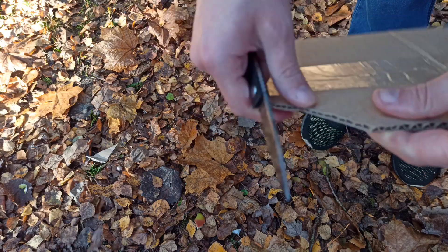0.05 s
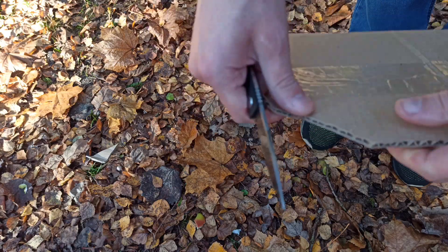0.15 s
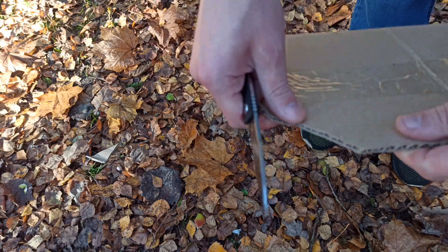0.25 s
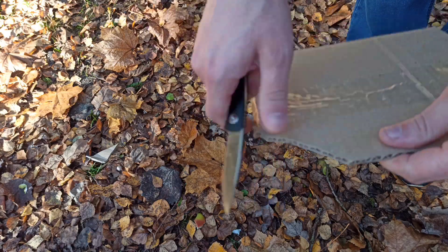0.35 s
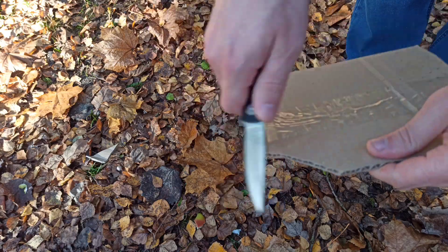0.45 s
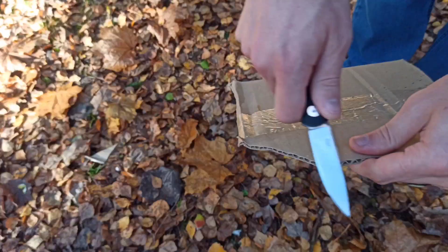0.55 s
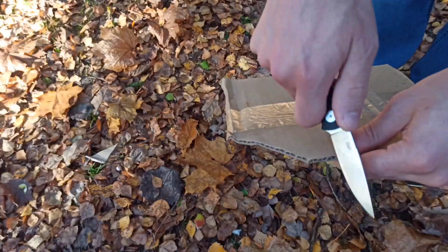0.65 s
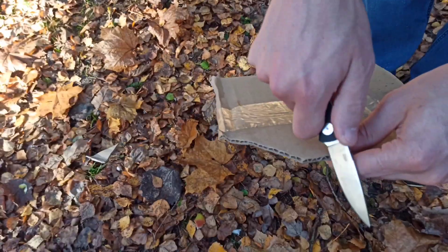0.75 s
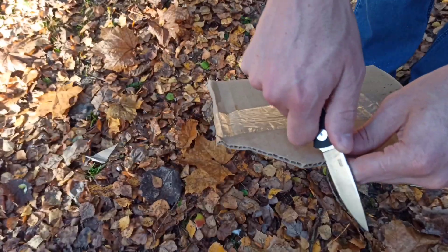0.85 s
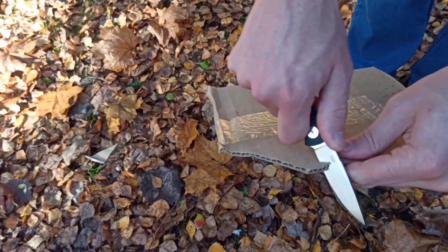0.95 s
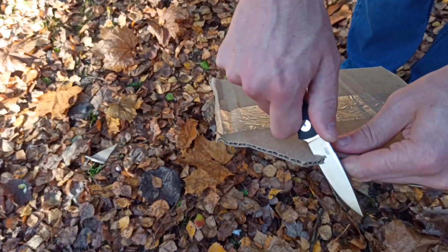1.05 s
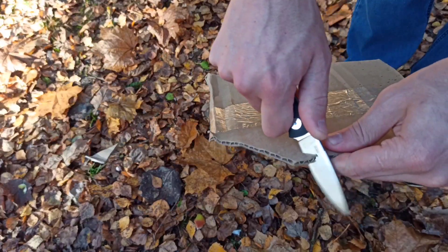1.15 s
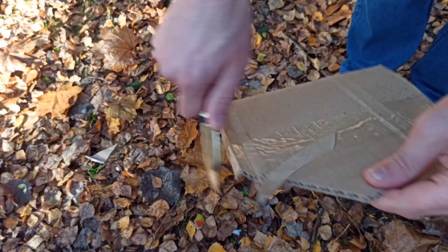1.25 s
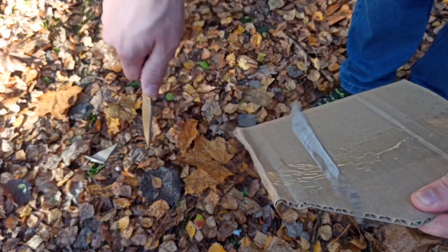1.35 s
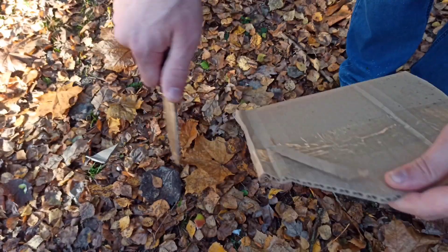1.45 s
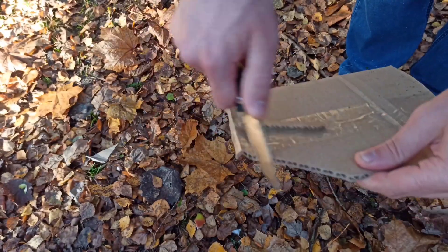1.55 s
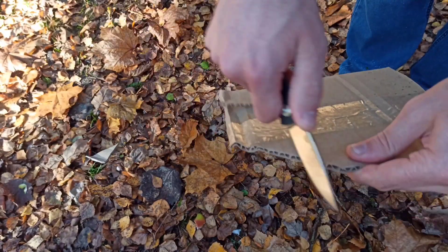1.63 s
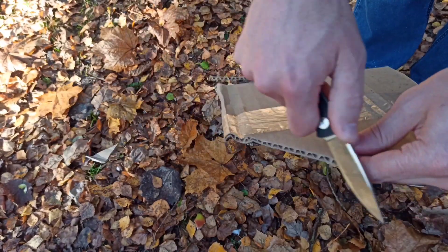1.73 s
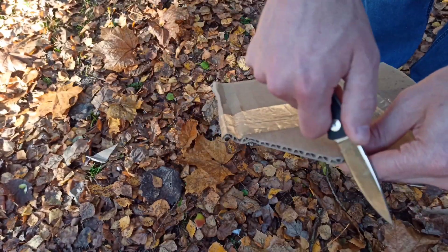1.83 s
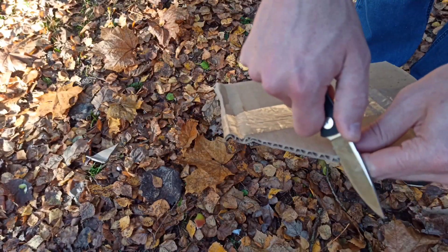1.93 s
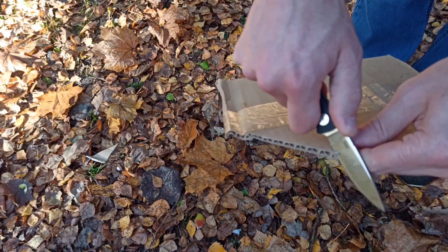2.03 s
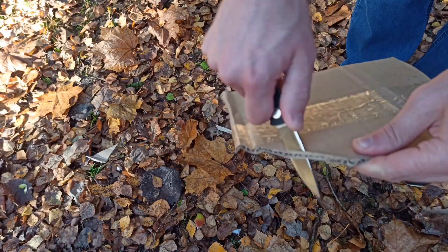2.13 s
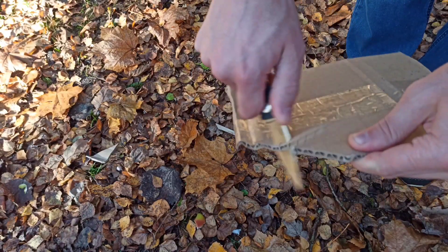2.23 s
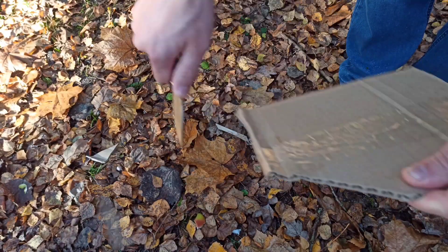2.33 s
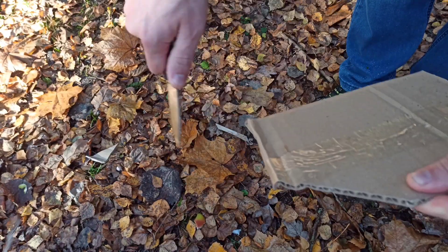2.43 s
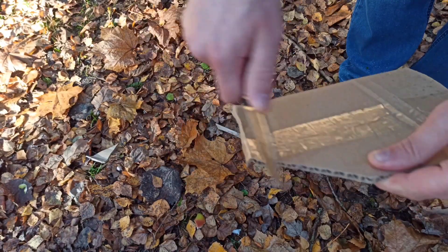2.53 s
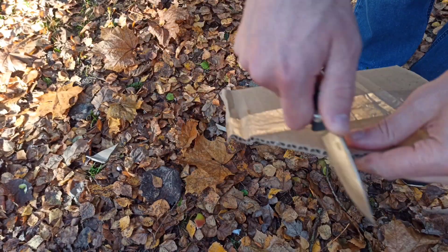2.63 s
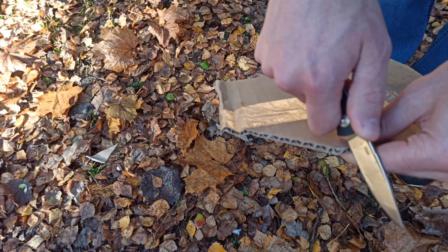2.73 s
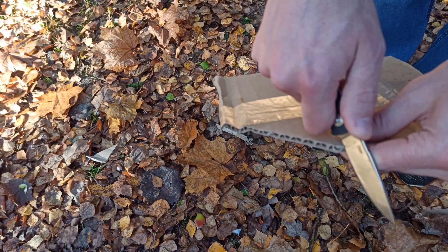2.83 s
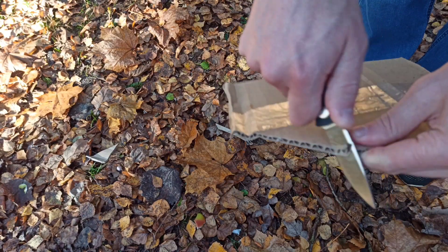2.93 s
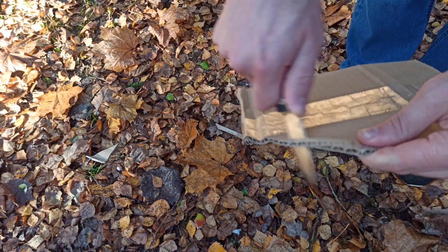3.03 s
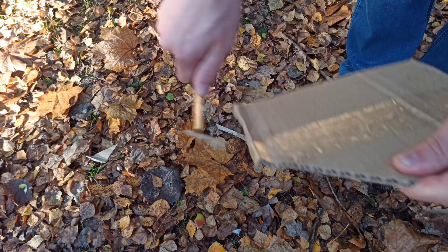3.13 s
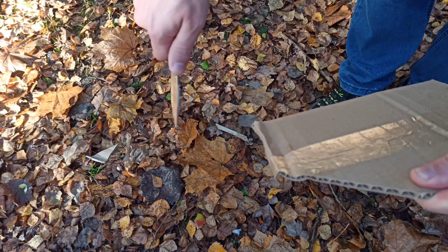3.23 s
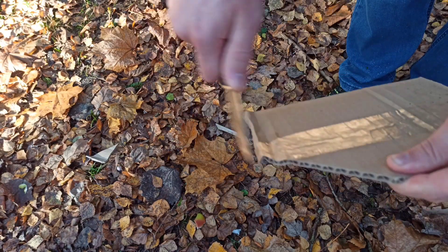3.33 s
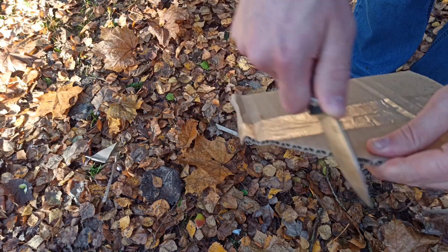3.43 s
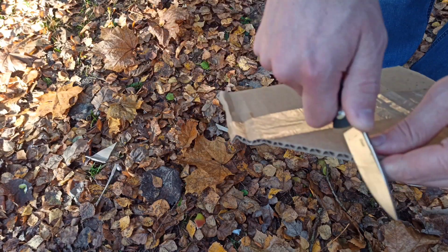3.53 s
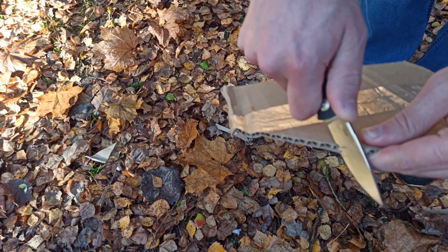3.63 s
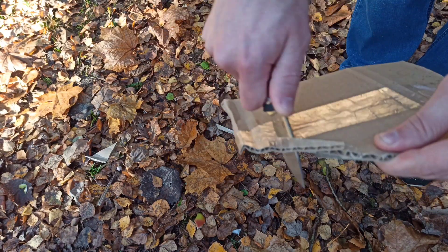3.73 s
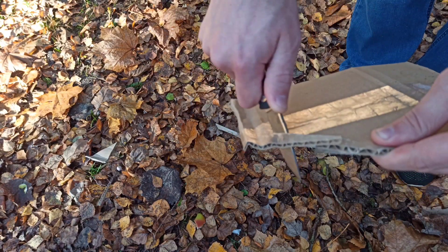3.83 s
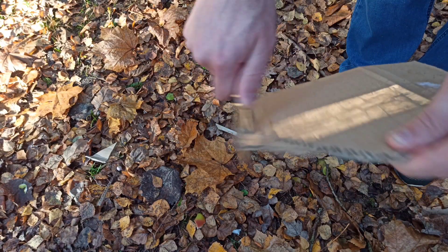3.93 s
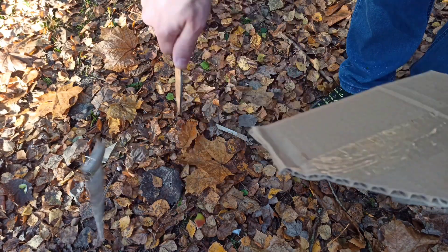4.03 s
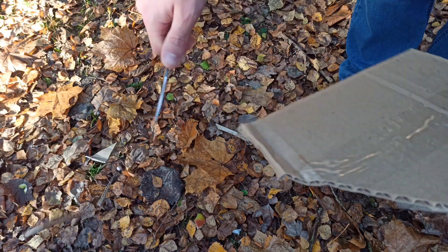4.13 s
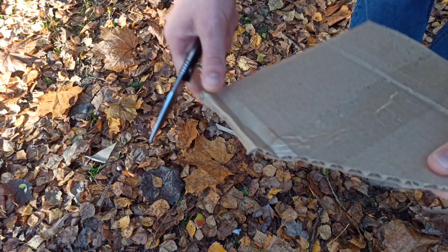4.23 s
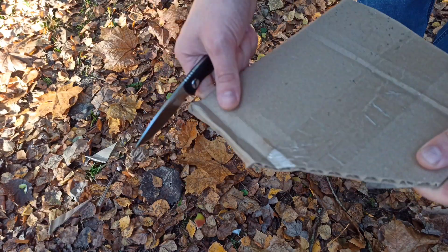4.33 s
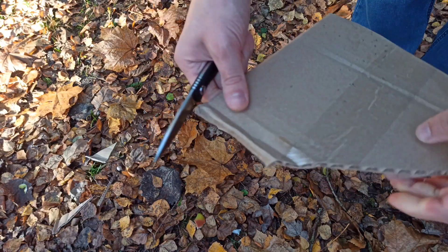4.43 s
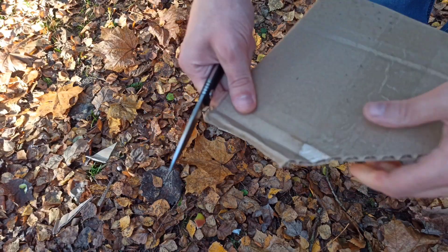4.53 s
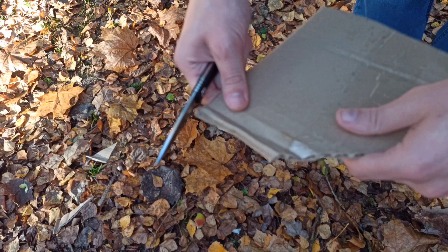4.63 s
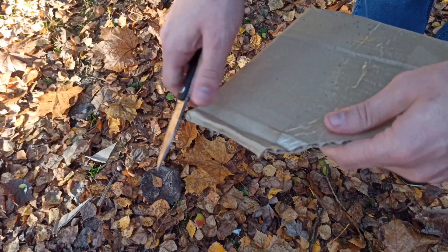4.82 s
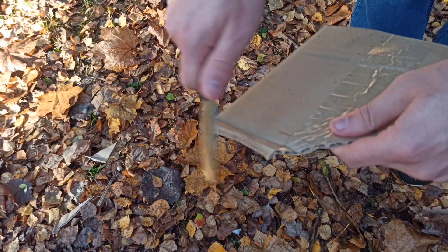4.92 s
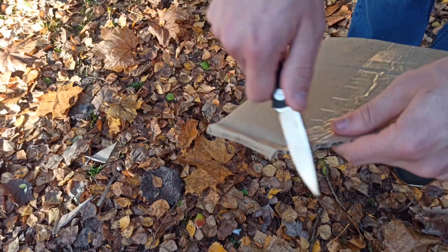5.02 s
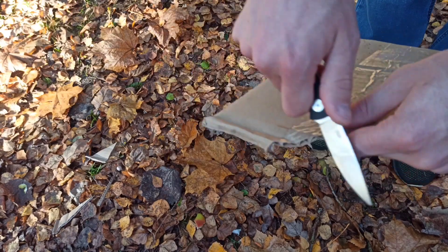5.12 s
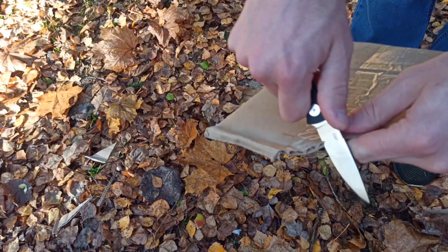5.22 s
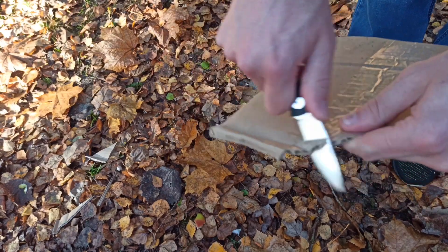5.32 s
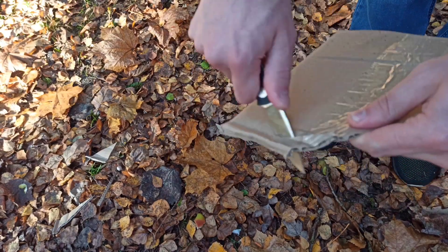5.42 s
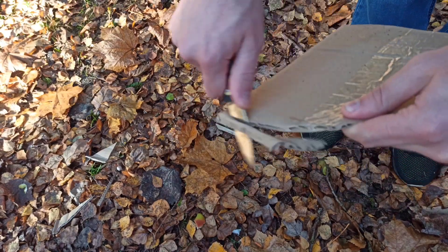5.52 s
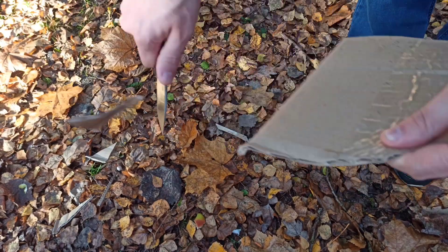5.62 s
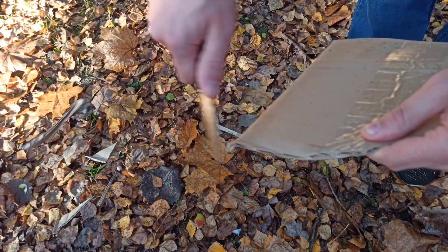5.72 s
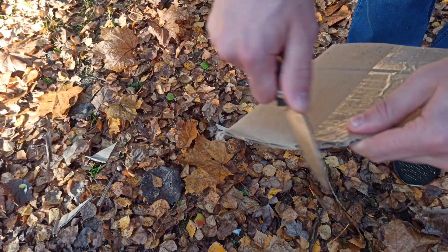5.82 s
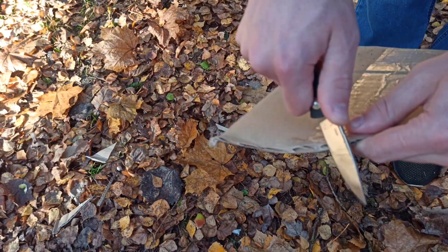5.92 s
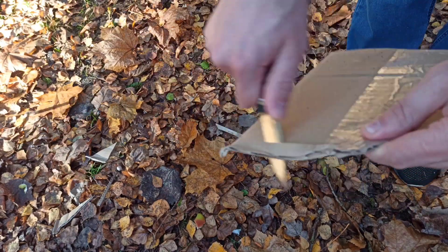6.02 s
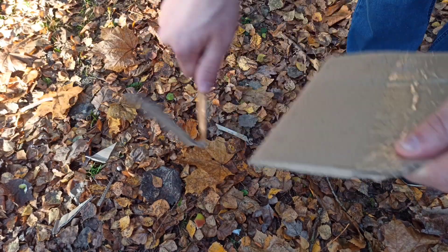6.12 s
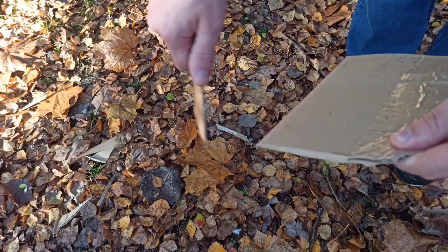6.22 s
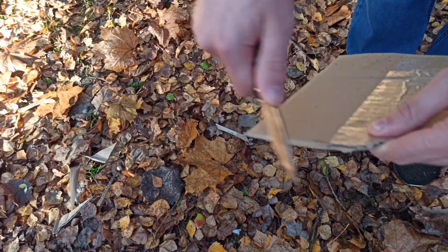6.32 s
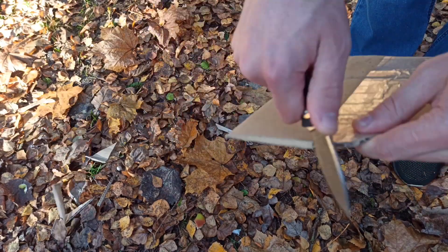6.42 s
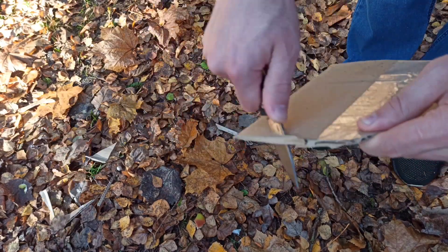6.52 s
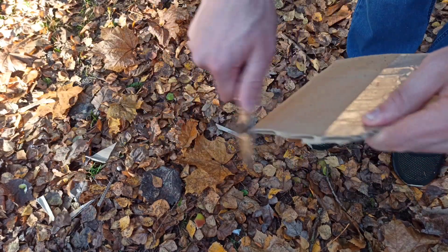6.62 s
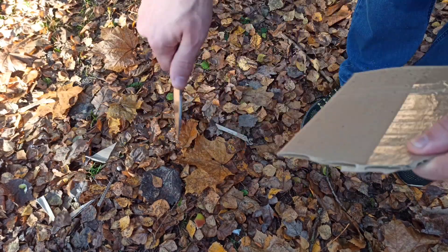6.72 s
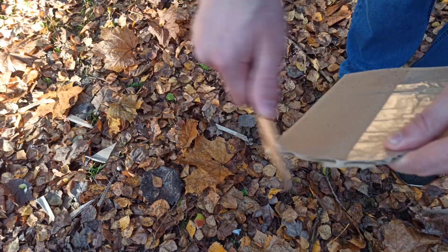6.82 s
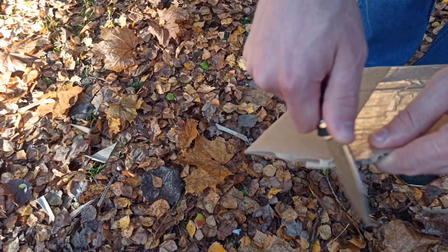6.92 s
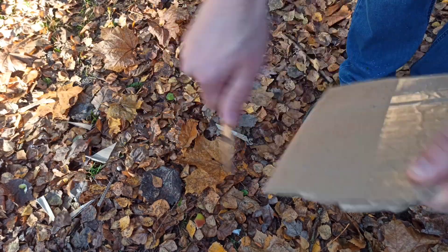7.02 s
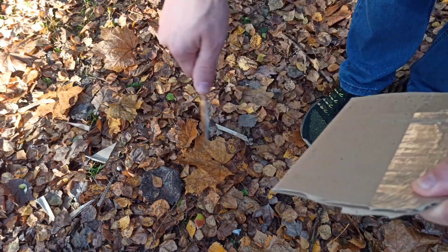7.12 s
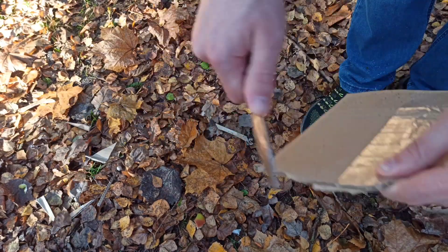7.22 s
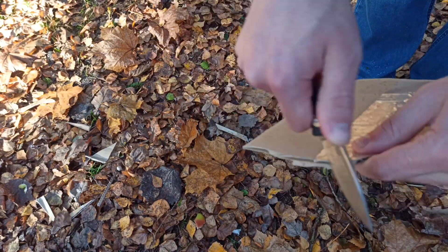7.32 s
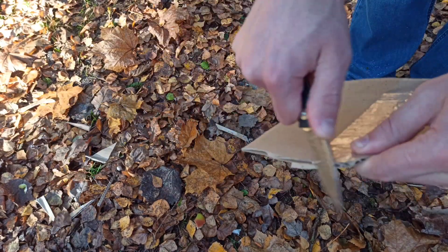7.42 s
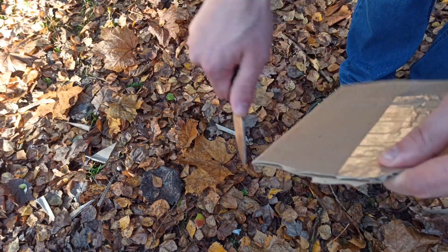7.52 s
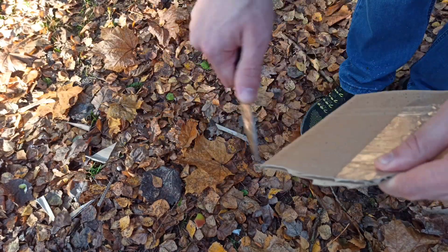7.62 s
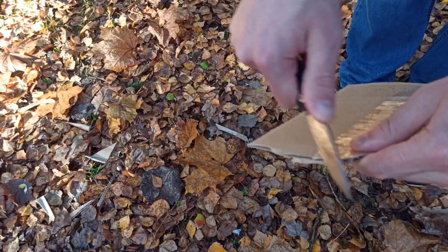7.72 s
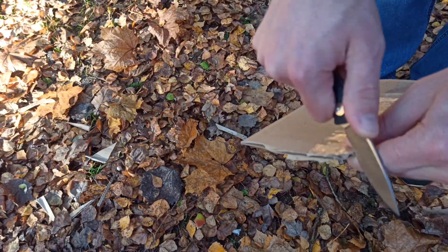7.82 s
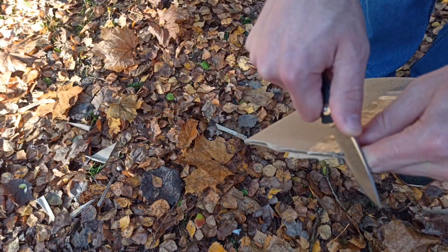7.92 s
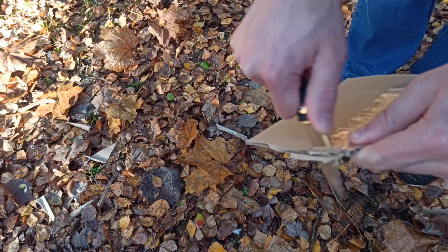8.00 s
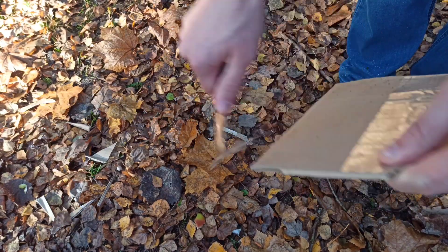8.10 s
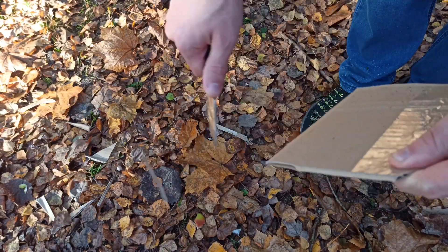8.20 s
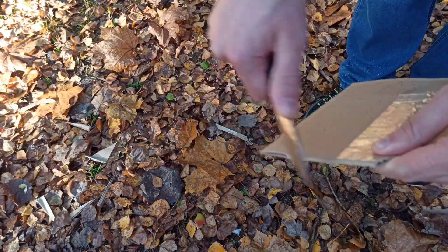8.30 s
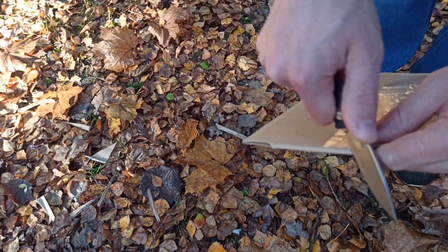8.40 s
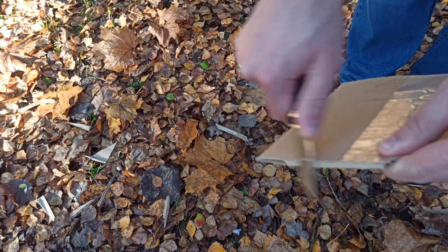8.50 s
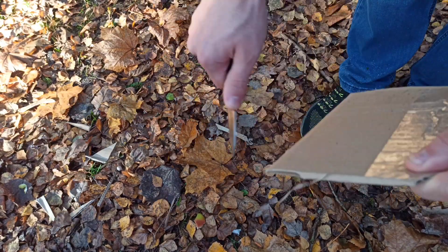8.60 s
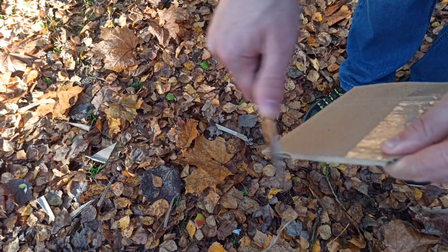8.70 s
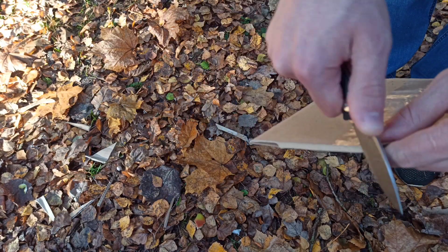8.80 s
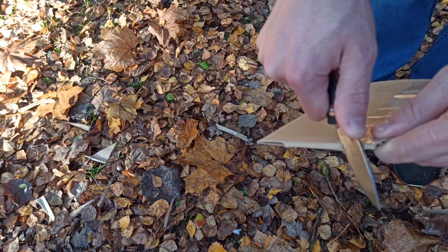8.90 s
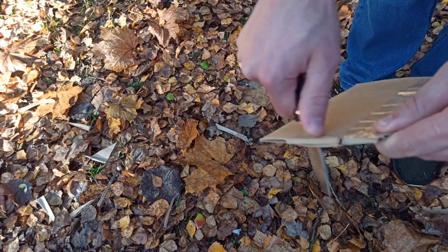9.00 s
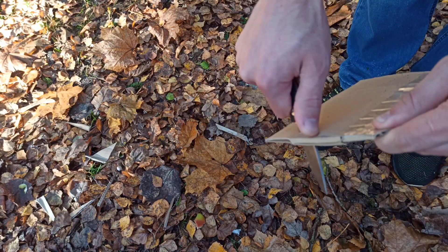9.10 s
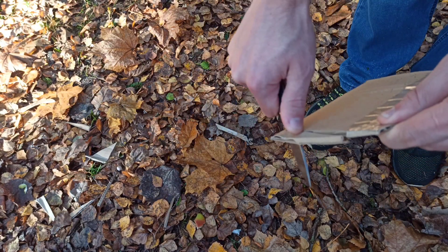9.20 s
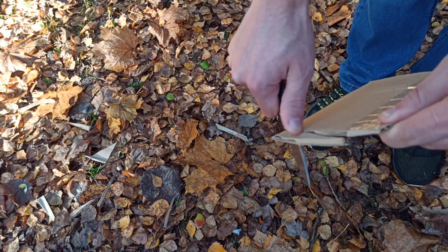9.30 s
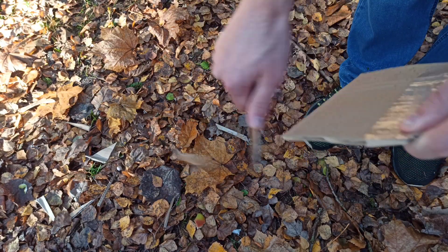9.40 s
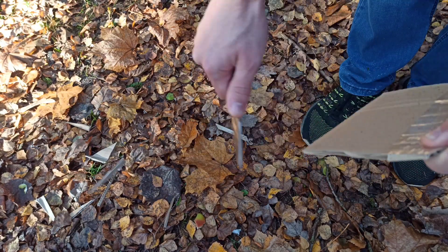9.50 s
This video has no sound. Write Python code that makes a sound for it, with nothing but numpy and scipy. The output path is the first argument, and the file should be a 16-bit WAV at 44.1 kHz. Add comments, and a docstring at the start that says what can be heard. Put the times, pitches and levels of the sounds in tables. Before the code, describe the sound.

Close, dry outdoor sound of a knife cutting strips from a hand-held sheet of corrugated cardboard. Short tearing rasps with bright hiss end in hollow cardboard pops and sharp cracks. A strip rattles briefly on the sheet after the first cut. Blade ticks, scuffs and soft thuds fill the gaps. After a handling pause mid-way, cuts become hissier, quicker and mostly softer. Faint air behind, phone microphone.

```python
"""A knife slices strips off a hand-held sheet of corrugated cardboard, close to a phone outdoors.
Parting fibres are dense random clicks, coloured into hiss and rasp, that also shake the sheet's modes.
At the end of a cut the sheet springs back with a hollow modal pop; louder cracks are noise bursts.
Between cuts the blade ticks and scuffs, touches thud in the sheet and one strip rattles down on it.
Behind it lies faint, slightly wavering shaped noise, plus a few faint midrange noise bursts."""
import sys
import numpy as np
from scipy import signal
from scipy.fft import rfft, irfft
from scipy.io import wavfile
from scipy.ndimage import uniform_filter1d

SR = 44100
rng = np.random.default_rng(int(sys.argv[2]) if len(sys.argv) > 2 else 0)


def persist_wave(psi):
    """Save psi, clipped to +-1, as 16-bit WAV."""
    counts = np.round(np.clip(psi, -1, 1) * 32767).astype(np.int16)
    wavfile.write(sys.argv[1], SR, np.atleast_2d(counts).T)


N = 421155


def undb(db):
    """Decibels to gain."""
    return 10 ** (np.asarray(db) / 20)


def unit(x):
    """Scale to rms 1."""
    return x / np.std(x)


def add(out, s, sound):
    """Mix a sound in at time s."""
    i = max(int(s * SR), 0)
    out[i:i + len(sound)] += sound[:N - i]


def walk(rate):
    """Smooth random wander with a spread near 1, taking `rate` steps a second."""
    k = int(SR / rate)
    steps = np.repeat(rng.standard_normal(N // k + 1), k)[:N]
    return uniform_filter1d(steps, k)


def colour(x, points):
    """Minimum-phase filter with the given (Hz, dB) outline: the sound keeps its sharp onset."""
    hz, db = np.transpose(points)
    size = 4096
    grid = np.maximum(np.arange(size // 2 + 1) * SR / size, 1)
    outline_db = np.interp(np.log(grid), np.log(np.sort(hz)), db)
    cepstrum = irfft(np.log(undb(outline_db)))
    # folding the cepstrum forward makes the filter causal
    cepstrum[1:size // 2] *= 2
    cepstrum[size // 2 + 1:] = 0
    response = irfft(np.exp(rfft(cepstrum)))
    return signal.oaconvolve(x, response)[:len(x)]


def ring(x, hz, t60):
    """One decaying mode driven by x; it takes at least 2 ms to fall by 60 dB."""
    pole = np.exp((2j * np.pi * hz - np.log(1000) / max(t60, .002)) / SR)
    return signal.lfilter([1], [1, -pole], x + 1e-18).imag


AIR_DB = -63.5
# tone of the open air: (frequency [Hz], level [dB])
AIR_TONE = [(25, -5), (50, -7), (80, 6), (160, 3), (300, -1), (500, -2.5), (1000, -11), (2100, -15.5),
            (2900, -19.5), (4200, -16), (7000, -23.5), (15000, -26)]
# faint bursts of filtered midrange noise: (time [s], length [s], level [dB])
MIDRANGE_NOISE_BURSTS = [(0.087, 0.66, -69), (2.518, 0.8, -66.5), (4.52, 0.67, -66.5), (6.972, 0.28, -62.5)]
# tone of those bursts: (frequency [Hz], level [dB])
MIDRANGE_TONE = [(400, 2), (1000, 2), (2200, 0.5), (2900, -12.5), (4300, -7), (7000, -33)]


def outdoors():
    """Faint open air as shaped noise that wavers a little, plus a few faint midrange noise bursts."""
    burst_gain = np.zeros(N)
    for s, length_s, db in MIDRANGE_NOISE_BURSTS:
        add(burst_gain, s, undb(db) * signal.windows.tukey(int(length_s * SR), .5))
    waver_db = 1.3 * walk(2.3)
    air = unit(colour(rng.standard_normal(N), AIR_TONE)) * undb(AIR_DB + waver_db)
    return air + burst_gain * unit(colour(rng.standard_normal(N), MIDRANGE_TONE))


# a cut strip bounces on the sheet: (time [s], peak level [dB])
STRIP_BOUNCES = [(1.389, -34), (1.419, -32), (1.436, -29.5), (1.444, -41), (1.478, -46), (1.5, -55),
                 (1.507, -50), (1.544, -43.5), (1.586, -40)]
# modes of the strip: (frequency [Hz], strength [dB], decay by 60 dB [s], held to 2 ms or more)
STRIP_RESONANCES = [(453, -8, 0.033), (774, -0.5, 0.029), (907, -1.5, 0.017), (1330, -4, 0.0065),
                    (4250, -1, 0.0025), (6800, 2, 0.0017)]


def strip(contact_s=0.0039):
    """A cut strip tumbles onto the sheet: each contact is a noise burst that rings its modes."""
    out, t = np.zeros(N), np.arange(SR // 12) / SR
    for s, db in STRIP_BOUNCES:
        contact = rng.standard_normal(len(t)) * np.exp(-t / contact_s)
        tap = sum(undb(g) * ring(contact, hz, t60) for hz, g, t60 in STRIP_RESONANCES)
        add(out, s, undb(db) * tap / np.abs(tap).max())
    return out


# low, woody part of a crack or tick: (frequency [Hz], level [dB])
KNOCK_TONE = [(150, -8.5), (500, -3.5), (1100, 0.5), (2000, -1.5), (4300, -2.5), (7000, -13.5),
              (15000, -14)]
GRAZE_SOFTENING, BUMP_SOFTENING = 0.67, 0.82  # how much more slowly a lighter tick or bump sets in


def crack(db, knock_db, burst_s, spectrum, softening,
          tail_s=0.009, tail_db=-21, rise_s=0.00045, firm_db=-17, spreading=0.19):
    """A bundle of fibres gives way at once: a sharp noise burst and a short crumbling tail."""
    t = np.arange(SR // 16) / SR
    # a light touch grazes the paper: it sets in more slowly and peaks lower still
    graze = undb(softening * max(firm_db - db, 0))
    rise = 1 - np.exp(-(t / (rise_s * graze)) ** 2)
    decay = np.exp(-t / burst_s) + undb(tail_db) * np.exp(-t / tail_s)
    burst = rng.standard_normal(len(t)) * rise * decay
    sound = unit(colour(burst, spectrum)) + undb(knock_db) * unit(colour(burst, KNOCK_TONE))
    peak = undb(db - 2.5) / graze ** spreading
    return peak * sound / np.abs(sound).max()


# the blade ticks against the edge: (time [s], strength [dB], before crack() trims it)
EDGE_TICKS = [(0.13, -37), (0.2506, -37), (.8074, -40.5), (.9203, -27.5), (1.5388, -29), (1.5855, -38),
              (1.62, -38), (3.3223, -30), (4.25, -27.5), (4.3055, -38), (4.367, -40), (5.8423, -23),
              (6.3596, -32), (6.3774, -28), (6.8956, -28), (8.3385, -28.5), (8.889, -27.5)]
# bright part of a tick: (frequency [Hz], level [dB])
TICK_TONE = [(600, -31.5), (2400, -9), (4200, 5.5), (7000, -3.5), (15000, -16.5)]
TICK_S, TICK_KNOCK_DB = 0.0021, -11


def ticks():
    """Between cuts the blade ticks against the edge: small, bright bursts with a faint knock."""
    out = np.zeros(N)
    for s, db in EDGE_TICKS:
        add(out, s, crack(db, TICK_KNOCK_DB, TICK_S, TICK_TONE, GRAZE_SOFTENING))
    return out


# modes of the sheet above its lowest, before stiffness and a random spread shift them:
# (frequency [Hz], strength [dB], decay by 60 dB [s])
SHEET_RESONANCES = [(394.6, -1.5, 0.04), (524, -13, 0.0031), (581, 0.5, 0.027), (819, 5.5, 0.022),
                    (1162, -4, .024), (1250, -17, 0.022), (2100, -16, .015)]
USUAL_HZ = 175  # lowest mode of the sheet at its usual overhang


def flick(db, low_hz, low_db, low_t60, push_s=0.0005, stiffening=0.21, leak_hz=190):
    """A brief push rings the sheet; a shorter, stiffer overhang raises all its modes."""
    t = np.arange(SR // 4) / SR
    # slow motion only pushes air around the edges of the sheet and radiates little bass
    bass_cut = signal.butter(2, leak_hz, "high", fs=SR, output="sos")
    push = signal.sosfilt(bass_cut, t / push_s * np.exp(-2 * t / push_s))
    spread = 1 + 0.054 * rng.standard_normal(len(SHEET_RESONANCES))
    stiff = (low_hz / USUAL_HZ) ** stiffening * spread
    pop = undb(low_db) * ring(push, low_hz, low_t60)
    # some modes move in opposite directions, so the pop swells over its first cycles
    for k, (hz, mode_db, t60) in enumerate(SHEET_RESONANCES):
        direction = (-1) ** (k // 2)
        pop = pop + direction * undb(mode_db) * ring(push, hz * stiff[k], t60)
    return -undb(db) * pop / np.abs(pop).max()


# blade or fingers bump the sheet:
# (time [s], thud peak level [dB], lowest mode [Hz], tick strength [dB], before crack() trims it)
SHEET_BUMPS = [(0.0381, -32.5, 219, -36), (.088, -34.5, 219, -30), (1.418, -23, 207, -15.5),
               (1.957, -69.5, 210, -26), (3.4797, -32, 201, -35), (4.275, -37.5, 183, -55),
               (4.304, -37, 108, -36), (4.63, -39.5, 123, -53), (4.7583, -39, 251, -22),
               (5.195, -41.5, 137, -29.5), (5.9089, -24, 145, -27), (6.4261, -22, 175, -25),
               (6.9216, -23.5, 174.5, -24), (7.3596, -25.5, 171, -28.5), (7.857, -46.5, 170, -33),
               (8.389, -37.5, 168, -35), (8.7879, -39.5, 160, -38)]
BUMP_T60_S, BUMP_T60_SLOPE, BUMP_KNOCK_DB = 0.064, 1.7, 10.5
# a softer bump leaves mostly the lowest mode
FIRM_BUMP_DB, BUMP_LOW_DB, BUMP_DULLING, DULLEST_DB = -21.5, -6, 1.3, 9


def bumps():
    """A touch ticks on the paper and thuds in the sheet, which it also damps."""
    out = np.zeros(N)
    for s, db, hz, tick_db in SHEET_BUMPS:
        low_db = min(BUMP_LOW_DB + BUMP_DULLING * (FIRM_BUMP_DB - db), DULLEST_DB)
        t60 = BUMP_T60_S * (USUAL_HZ / hz) ** BUMP_T60_SLOPE
        add(out, s, flick(db, hz, low_db, t60))
        add(out, s, crack(tick_db, BUMP_KNOCK_DB, burst_s=0.0012, spectrum=TICK_TONE,
                          softening=BUMP_SOFTENING))
    return out


BITE_S, RELEASE_S = .0008, 0.0043  # smoothing times of a gesture's onset and end


def gesture(rows):
    """Gain of (s, swell s, ease s, crest dB, swell dB, ease dB) rows: fast bite, slower release."""
    gain = np.zeros(N)
    for s, swell_s, ease_s, db, swell_db, ease_db in rows:
        t = np.arange(int((swell_s + ease_s) * SR)) / SR
        below_crest = swell_db * np.maximum(1 - t / swell_s, 0) ** 1.34
        past_crest = ease_db * np.maximum((t - swell_s) / ease_s, 0)
        add(gain, s, undb(db - below_crest - past_crest))
    keeps = np.exp(-1 / (np.array([BITE_S, RELEASE_S]) * SR))
    fast, slow = (signal.lfilter([1 - k], [1, -k], gain + 1e-18) for k in keeps)
    return np.maximum(fast, slow)


def fibres(rate, spread_db, bunch_hz, bunch_db):
    """Tiny breaks of uneven size, bunched as the edge catches and slips."""
    breaks = rng.random(N) < rate / SR
    size = undb(spread_db * np.minimum(rng.exponential(size=N), 5))
    sign = rng.choice([-1, 1], N)
    return unit(breaks * size * sign * undb(bunch_db * walk(bunch_hz)))


def through_card(x, tail_s, tail_db, hold_s=.07):
    """Each break echoes around the flutes; the dense resonances shift as the blade travels."""
    hop, t = int(hold_s * SR), np.arange(SR // 30) / SR
    out, window = x.copy(), np.hanning(2 * hop)
    # a fresh random echo crossfades in every hold_s
    for i in range(0, N - 2 * hop, hop):
        echo = rng.standard_normal(len(t)) * np.exp(-t / tail_s)
        echo /= np.linalg.norm(echo)
        add(out, i / SR, undb(tail_db) * signal.fftconvolve(x[i:i + 2 * hop] * window, echo))
    return out


# light scuffs of blade and fingers over the card, levels before smoothing and trims:
# (time [s], length [s], hiss level [dB], rasp level [dB])
CARD_SCUFFS = [(0.037, 0.08, -45, -49.5), (0.235, .065, -63, -58.5), (.895, 0.066, -45.5, -50.5),
               (1.581, .12, -63, -69.5), (1.847, 0.01, -44.5, -54.5), (1.899, 0.034, -49, -56),
               (1.947, 0.04, -53, -57.5), (1.993, 0.056, -53, -60), (2.16, 0.063, -47.5, -54.5),
               (2.596, 0.032, -52.5, -64.5), (2.642, .06, -63, -69), (2.793, 0.064, -55, -63),
               (3.321, 0.014, -42, -55.5), (3.349, 0.025, -53, -65), (3.501, 0.08, -43.5, -49),
               (4.13, 0.061, -69, -64), (4.244, 0.033, -48.5, -57), (4.273, .12, -56.5, -62),
               (4.526, 0.23, -60.5, -60), (4.734, 0.048, -53, -57.5), (5.192, 0.048, -44.5, -51.5),
               (5.839, 0.072, -50.5, -61), (6.357, 0.041, -47.5, -55.5), (6.892, 0.025, -46, -61),
               (7.852, 0.042, -51.5, -58.5), (8.332, 0.025, -49, -51.5), (9.243, 0.046, -55, -65)]
SCUFF_CREST, SCUFF_SWELL_DB, SCUFF_FADE_DB = 0.74, 3, 13  # crest as a share of the length


def scuff_gain(axis):
    """Every scuff swells and fades alike, up to the level in one of its columns."""
    return gesture([(row[0], SCUFF_CREST * row[1], (1 - SCUFF_CREST) * row[1], row[axis],
                     SCUFF_SWELL_DB, SCUFF_FADE_DB) for row in CARD_SCUFFS])


# fibre hiss and card rasp when chopping across the flutes: (frequency [Hz], level [dB])
HISS_ACROSS = [(1200, -33), (2500, -10.5), (3300, -2.5), (4500, -0.5), (7000, -0.5), (9000, -3),
               (13000, -6.5), (15500, -8.5)]
CARD_ACROSS = [(170, -26), (300, -2), (440, 8.5), (650, 1.5), (1100, 5), (1400, 2), (2200, -3.5),
               (3500, -29.5), (7000, -43.5)]


def scuffing():
    """Steel and skin slide lightly over the paper: fewer, looser catches hiss and shake the card."""
    loose = fibres(rate=2400, spread_db=2.5, bunch_hz=257.2, bunch_db=5.5)
    catches = through_card(loose, tail_s=0.0032, tail_db=2.5)
    hiss = unit(colour(catches, HISS_ACROSS)) * scuff_gain(axis=2) * undb(-1.5)
    rasp = unit(colour(catches, CARD_ACROSS))
    bending = unit(ring(ring(catches, hz=206, t60=0.024), hz=227, t60=0.021))
    return hiss + (rasp + undb(-2.0) * bending) * scuff_gain(axis=3)


# the sheet springs free at the end of a cut:
# (time [s], peak level [dB], lowest mode [Hz], strength of that mode [dB])
SHEET_POPS = [(1.2372, -8, 212, 2), (2.2535, -11.5, 192, -1), (3.0685, -12, 206, 10.5),
              (3.9124, -13, 245, -1), (5.542, -24.5, 147, 1), (6.0703, -12.5, 160.4, -4),
              (6.616, -19.5, 174, 1), (7.001, -13, 174, -6), (7.4975, -19, 178, -2.5),
              (8.0648, -19.5, 179, -5), (8.527, -16.5, 177.4, -4.5), (9.366, -33.5, 195, 4.5)]
# decay of the lowest mode at its usual pitch; a stiffer overhang dies sooner
POP_T60_S, POP_T60_SLOPE, LONGEST_POP_T60_S = 0.11, 4.1, .14


def pops():
    """The blade leaves the edge and the freed sheet rings hollow."""
    out = np.zeros(N)
    for s, db, hz, low_db in SHEET_POPS:
        t60 = min(POP_T60_S * (USUAL_HZ / hz) ** POP_T60_SLOPE, LONGEST_POP_T60_S)
        add(out, s, flick(db, hz, low_db, t60))
    return out


# the loudest cracks of paper in the cuts:
# (time [s], strength [dB], before crack() trims it, low knock against the treble [dB])
PAPER_CRACKS = [(1.1479, -19.5, -10), (1.1645, -15, -16), (1.1767, -14, -10), (1.192, -15.5, -20),
                (1.2078, -12, -20), (1.235, -5.5, 14.5), (2.0467, -19.5, -8), (2.2526, -8, 29),
                (2.867, -28, -14), (3.0637, -16.5, -16.5), (3.6365, -19, 8), (3.6627, -13, 2.5),
                (3.9115, -10.5, -12.5), (5.5237, -28.5, -23), (5.534, -15, -7), (6.0626, -17.5, 3),
                (6.4553, -12.5, 2.5), (6.6067, -11, -22), (6.9886, -21.5, -16), (7.497, -25.5, -24),
                (9.3474, -17.5, -31), (9.3515, -9, -7)]
# bright part of splitting paper: (frequency [Hz], level [dB])
SPLIT_TONE = [(600, -17.5), (2000, -10), (4000, -1), (7500, -3.5), (15000, -13.5)]
CRACK_S = 0.0028


def cracks():
    """Paper cracks under the edge: bursts that range from bright snaps to low knocks."""
    out = np.zeros(N)
    for s, db, knock_db in PAPER_CRACKS:
        add(out, s, crack(db, knock_db, CRACK_S, SPLIT_TONE, GRAZE_SOFTENING))
    return out


# the sheet is turned once: before, the blade chops across the flutes; after, it slides along them
TURN_S = 4.6


def by_direction(x, across, along):
    """Colour x by the way the blade meets the flutes."""
    turn = int(TURN_S * SR)
    return np.concatenate([unit(colour(x[:turn], across)), unit(colour(x[turn:], along))])


# pushes of the blade, levels before smoothing and trims; a negative ease keeps growing:
# (time [s], swell [s], ease [s], crest level [dB], swell depth [dB], ease depth [dB],
#  rasp against hiss [dB])
BLADE_PUSHES = [(1.153, 0.027, 0.056, -29.5, 15.5, -2.5, -3), (2.025, .04, 0.043, -34, 7.5, 0.5, -3),
                (2.203, 0.053, 0.0068, -26.5, 6, 16, -2.5), (2.849, 0.048, 0.061, -40.5, 8, 3, -9),
                (2.957, .1, 0.011, -28.5, 12.5, 0, -2.5), (3.616, 0.025, 0.126, -30, 24, 16.5, -6),
                (3.768, .012, 0.11, -46, 4, 3, -8), (3.858, 0.025, 0.039, -30, 18, -3.5, -4.5),
                (5.279, 0.053, 0.058, -29, 15, 22.5, -6), (5.39, 0.045, 0.049, -29.5, 13, 1.5, -7.5),
                (5.485, 0.046, 0.01, -26, 3.5, 10, -7.5), (5.923, 0.05, 0.1, -30.5, 14, -1, -9),
                (6.426, 0.023, 0.073, -29.5, 5.5, 10, -8.5),
                (6.522, 0.083, 0.0063, -27.5, 13.5, -1.5, -10.5),
                (6.921, 0.025, 0.03, -31.5, 6.5, 20, -4.5), (6.975, 0.016, 0.007, -24.5, 27, 2.5, -5.5),
                (7.361, 0.039, 0.091, -42, 13.5, -2, -6.5), (7.898, 0.073, 0.068, -32.5, 23.5, -3.5, -10.5),
                (8.048, 0.009, 0.0095, -35.5, 10, 8, -6), (8.406, 0.033, 0.088, -37, 14, -5, -9),
                (8.789, 0.05, 0.07, -37, 13, 19.5, -9), (8.914, 0.051, 0.1, -33, 0, 21.5, -10),
                (9.065, 0.084, 0.057, -33, 16.5, 13, -11), (9.294, 0.056, .014, -29, 42, 25, -8.5)]
# fibre hiss and card rasp when sliding along the flutes: (frequency [Hz], level [dB])
HISS_ALONG = [(1200, -14.5), (2500, -23.5), (3300, -2.5), (4500, 0.5), (7000, 1), (9000, -1), (13000, -3.5),
              (15500, -4.5)]
CARD_ALONG = [(200, -18.5), (320, -7.5), (460, 2), (650, -2), (980, -1.5), (1090, 4), (1200, -5),
              (1500, -4.5), (2200, -7), (3500, -8), (7000, -38.5)]
# one force drives hiss and rasp; the sheet's bending follows the rasp's force
HISS_DB, RASP_DB, BEND_ACROSS_DB, BEND_ALONG_DB = -2, -1.5, -2.5, -19
FIRM_PUSH_DB, BODY_GROWTH = -30, 0.87  # the card's body grows more slowly with force than the hiss


def cutting():
    """Breaking fibres hiss at the edge, rasp through the card and shake its bending mode."""
    force = gesture([row[:6] for row in BLADE_PUSHES])
    body_rows = []
    for s, swell_s, ease_s, db, swell_db, ease_db, rasp_db in BLADE_PUSHES:
        crest_db = FIRM_PUSH_DB + BODY_GROWTH * (db - FIRM_PUSH_DB) + rasp_db
        body_rows.append((s, swell_s, ease_s, crest_db, BODY_GROWTH * swell_db, BODY_GROWTH * ease_db))
    shake = gesture(body_rows)
    breaks = fibres(rate=12000, spread_db=2.5, bunch_hz=500, bunch_db=2.7)
    edge = through_card(breaks, tail_s=0.0051, tail_db=-3)
    hiss = by_direction(edge, HISS_ACROSS, HISS_ALONG) * force * undb(HISS_DB)
    # the blade pins the sheet, so its modes are short and only colour the rasp
    body = through_card(breaks, tail_s=0.0032, tail_db=-3)
    rasp = by_direction(body, CARD_ACROSS, CARD_ALONG) * shake * undb(RASP_DB)
    # chopping across the flutes bends the sheet far more than sliding along them
    bend_db = np.where(np.arange(N) / SR < TURN_S, BEND_ACROSS_DB, BEND_ALONG_DB)
    bending = unit(ring(ring(breaks, hz=205.6, t60=0.029), hz=218, t60=0.041))
    return hiss + rasp + bending * shake * undb(bend_db)


def scene():
    """Everything sounds within arm's reach, with no walls to answer."""
    background = outdoors()
    handling = strip() + ticks() + bumps() + scuffing()
    cuts = pops() + cracks() + cutting()
    return (background + handling + cuts)[None]


# colour of the phone's microphone: (frequency [Hz], level [dB])
MICROPHONE_TONE = [(4650, -1), (4850, -7), (5950, -4.5), (6250, 5), (7300, 6.5), (7550, 11), (7800, 3.5),
                   (8450, 3.5), (8650, -12), (11500, -19), (11750, 1)]
TOP_HZ = 15700


def record(dry):
    """The phone thins the deep bass, colours the treble and cuts the top."""
    bass_cut = signal.butter(2, 70, "high", fs=SR, output="sos")
    top_cut = signal.ellip(8, .2, 70, TOP_HZ, fs=SR, output="sos")
    sound = signal.sosfilt(bass_cut, colour(dry[0], MICROPHONE_TONE))
    return signal.sosfilt(top_cut, sound)[None]


dry = scene()
out = record(dry)
persist_wave(out)
```